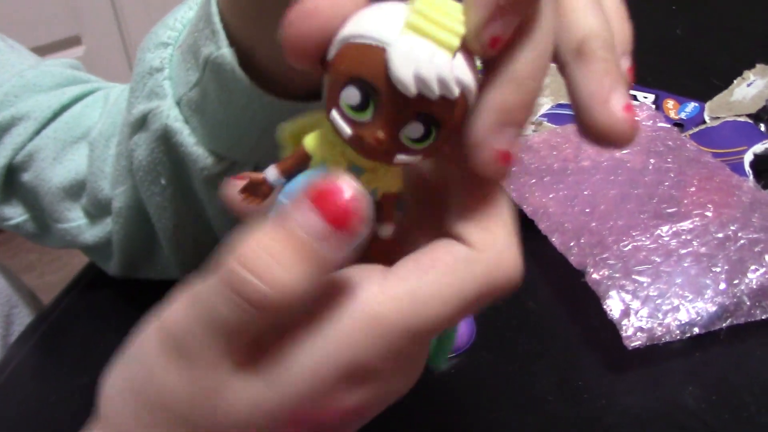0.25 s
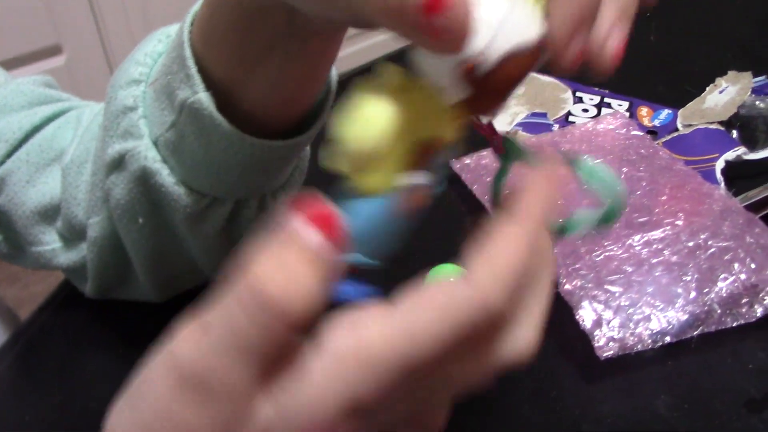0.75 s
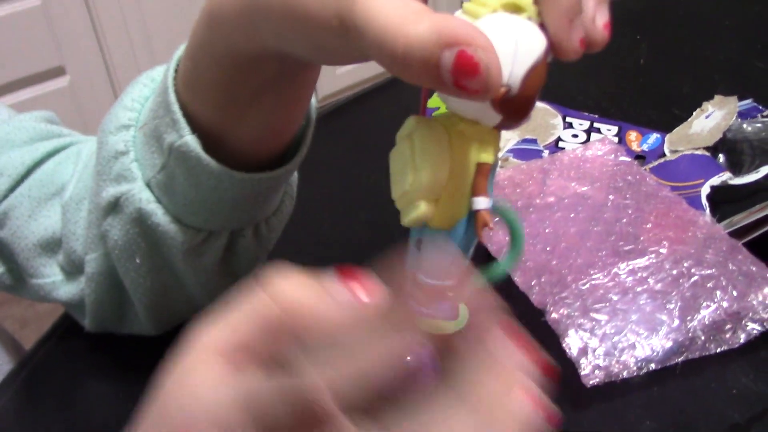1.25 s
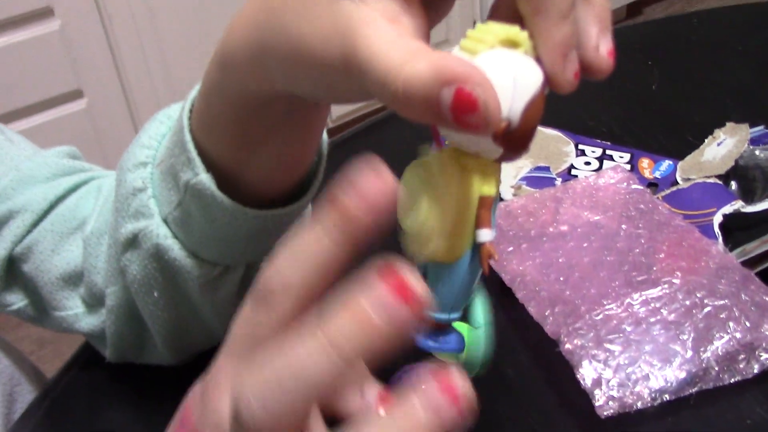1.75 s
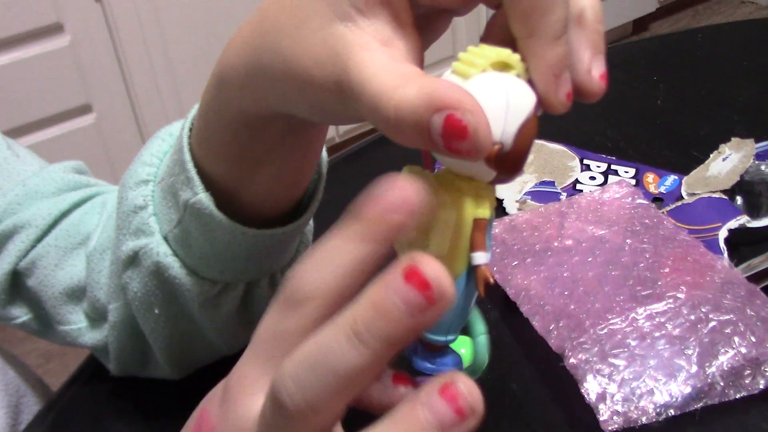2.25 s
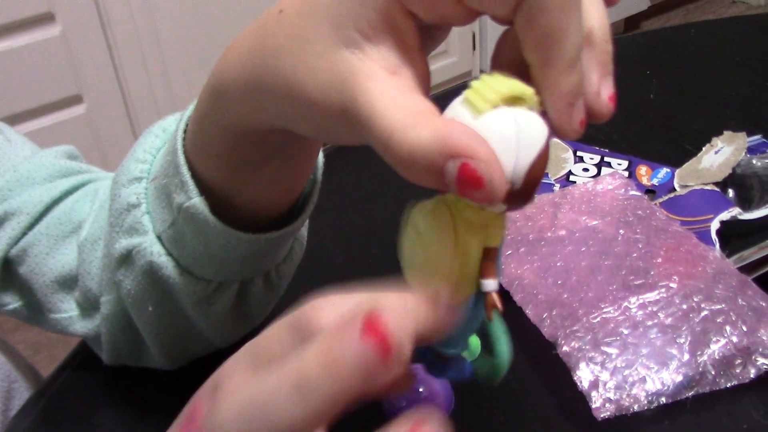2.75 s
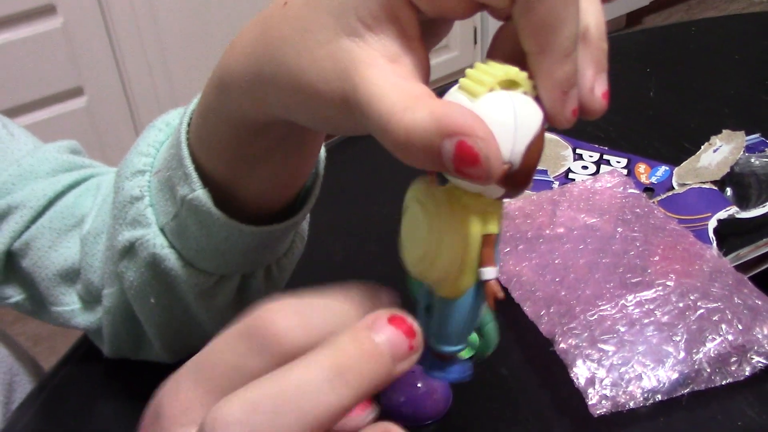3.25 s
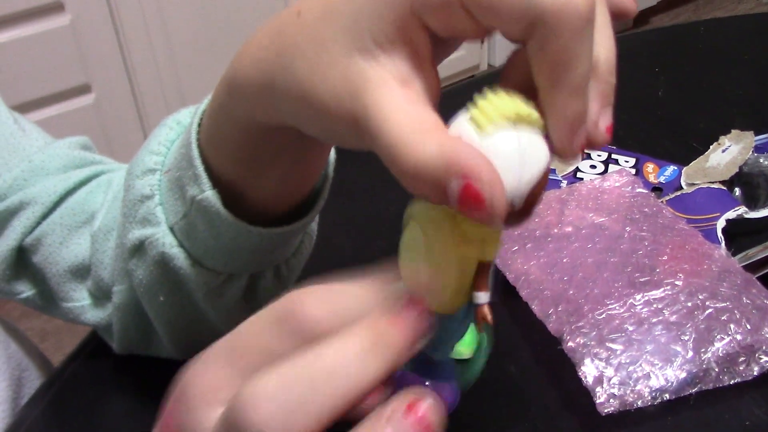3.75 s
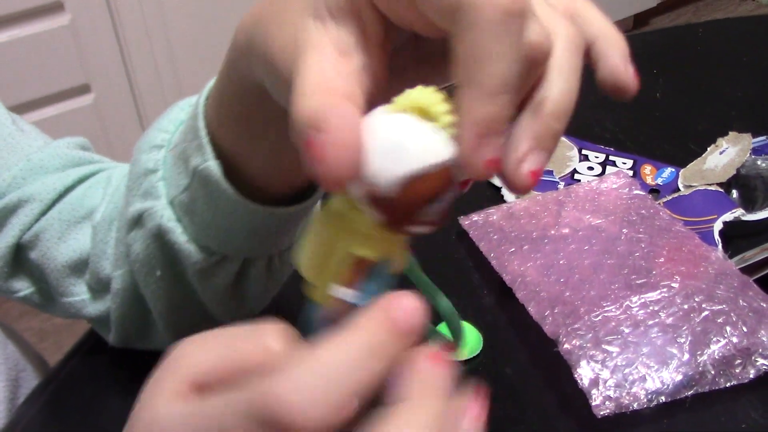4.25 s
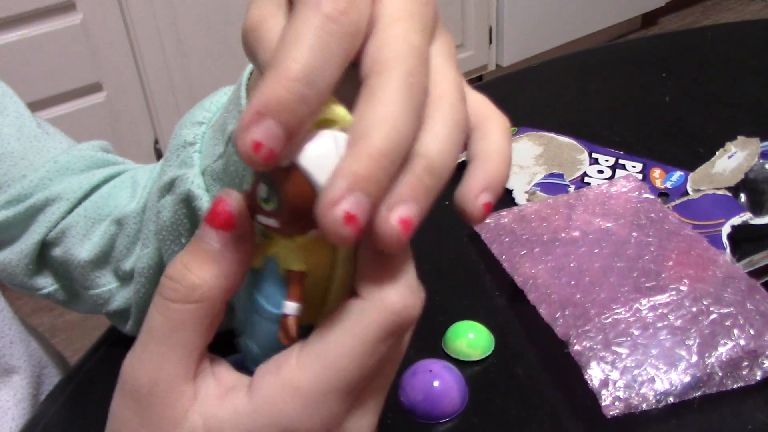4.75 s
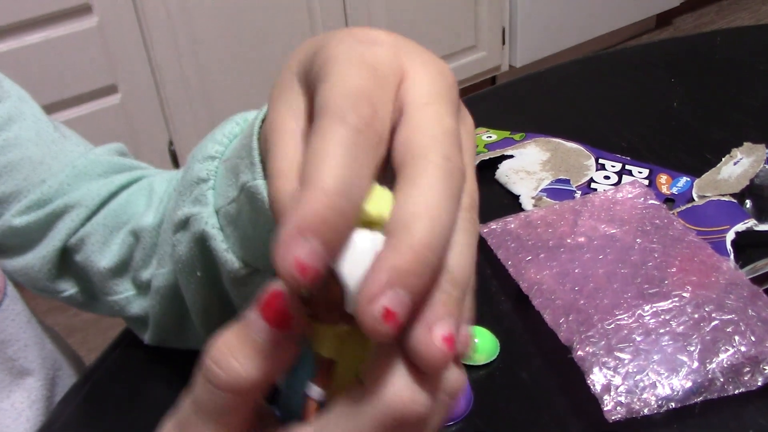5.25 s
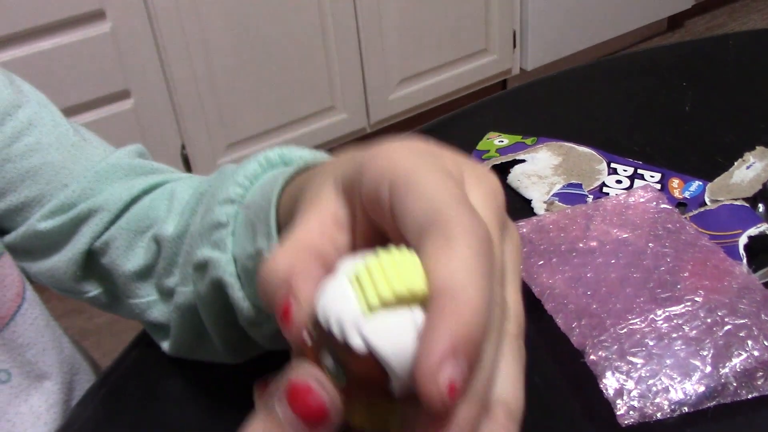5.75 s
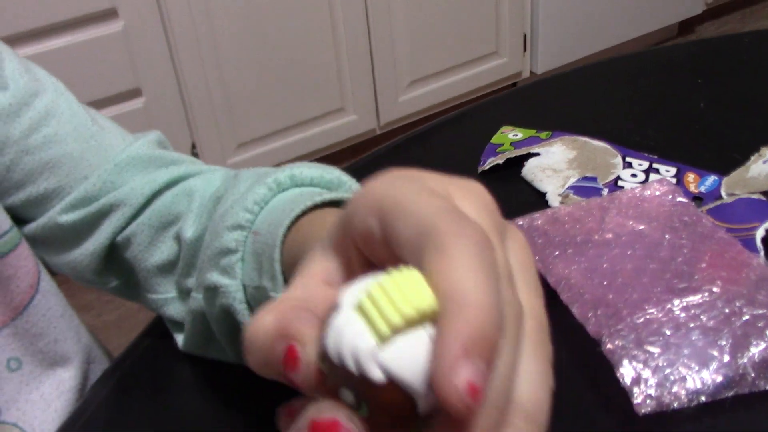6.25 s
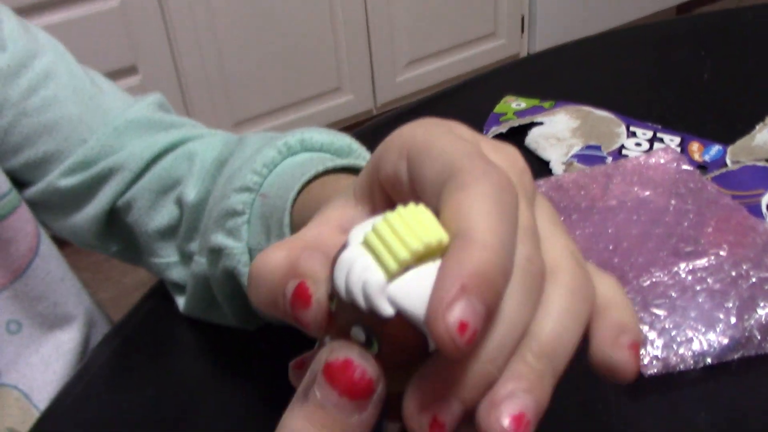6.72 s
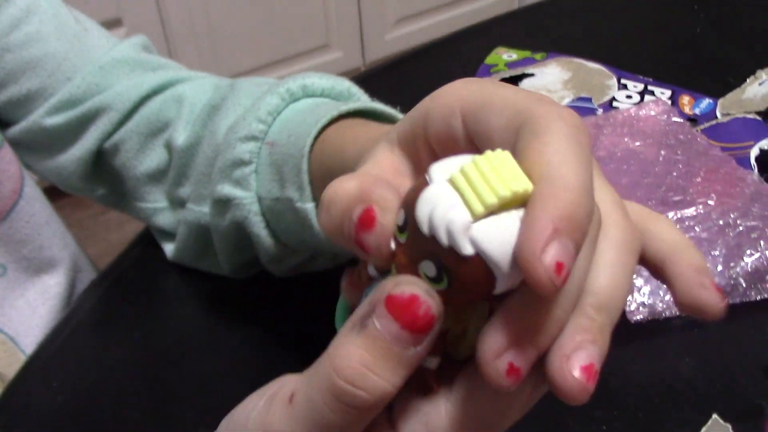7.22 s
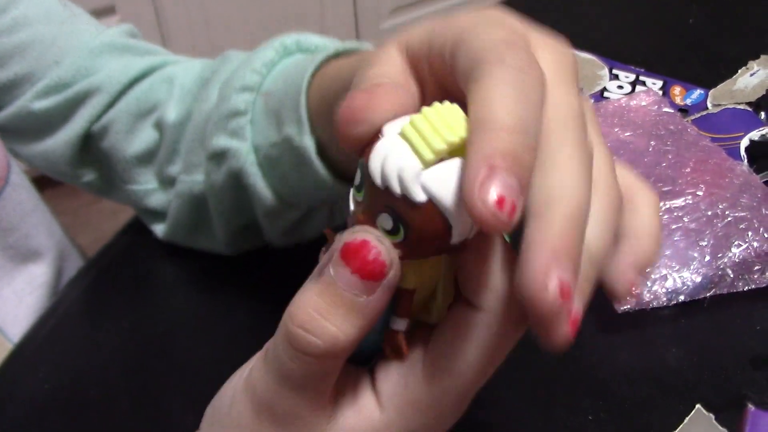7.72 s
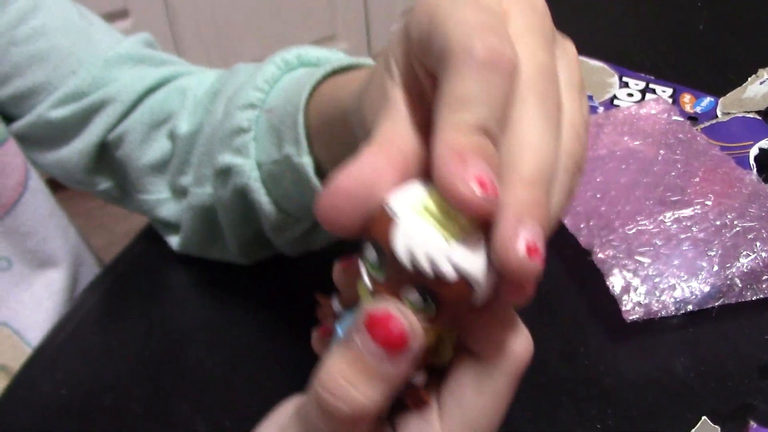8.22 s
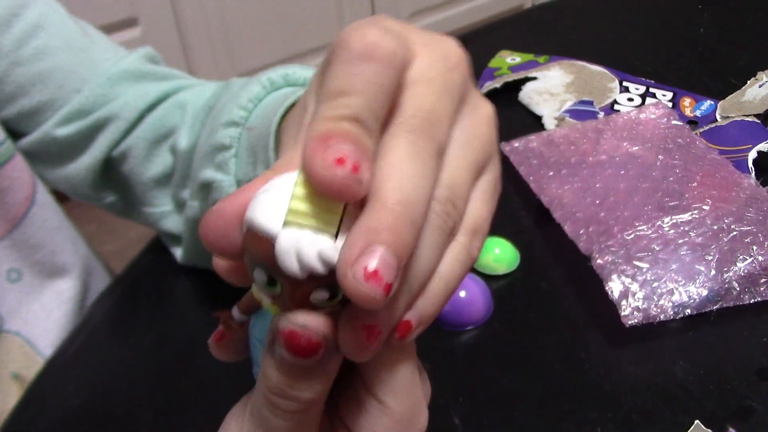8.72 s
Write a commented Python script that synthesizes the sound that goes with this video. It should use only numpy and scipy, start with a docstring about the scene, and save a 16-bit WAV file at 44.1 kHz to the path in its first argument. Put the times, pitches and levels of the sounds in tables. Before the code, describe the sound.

In a quiet kitchen, a low steady hum, soft hiss and a faint once-a-second clock tick run throughout. A small plastic toy is handled close to the microphone. From 0 to 1.3 s there are short scrapes and dry, muffled knocks, one stronger at 1.0. From 1.3 to 4 s the loose parts dangle and ring more freely: a dense rattling flurry at 1.3-1.6, scattered clacks and rubs, then strong knocks around 3.4 and 3.7. Soft wrist thuds touch the table near 1.1, 3.0 and 3.5. Handling thins out by 4.8. From 5.3 a stiff joint snaps sharply, irregularly until 7.5, with tiny pitched ticks between and clearer ones at 7.6-7.8. After a weak dull click at 8.0 and a faint rub, three much louder, brittle cracks hit at 8.6, 8.7 and 8.8, echoing briefly off the walls.

```python
"""Hands fiddle with a small plastic toy over a table in a quiet kitchen; drone, clock and room noise run throughout.
For some five seconds flicked parts knock and scrape (decaying modes, clumped impacts); wrists thud on the table.
Then a stiff joint snaps repeatedly (short shell modes plus noise), loudest at the end, amid small pitched ticks.
The room answers the toy with sparse decaying echoes; the air is shaped noise with narrow peaks."""
import sys
import numpy as np
from scipy import signal
from scipy.io import wavfile
from scipy.ndimage import uniform_filter1d

SR = 44100
rng = np.random.default_rng(int(sys.argv[2]) if len(sys.argv) > 2 else 0)


def transcribe(signal):
    """Save signal, clipped to [-1, 1], as a 16-bit WAV file at the path in sys.argv[1]."""
    frames = np.atleast_2d(signal).T
    limited = np.clip(frames, -1, 1)
    pcm = np.round(limited * 32767).astype(np.int16)
    wavfile.write(sys.argv[1], SR, pcm)


def invert_db(x):
    """Field ratio 10**(x/20) for x, a level in decibels (scalar or array-like)."""
    u = np.asarray(x, float) / 20
    return 10 ** u


N = 396018

# modes of the loose parts: f/Hz, level in its band/dB, t60/s
PARTS_MODES = [(1630, -11, .025), (2500, 1, .03), (2750, -4, .028), (4870, 0, .055), (5690, -4, .025),
               (6800, -1, .014), (7900, -6, .014), (8750, 0, .035), (9350, -3, .02), (11200, -9, .02)]
# borders of the low, middle and high bands of the parts: f/Hz
PARTS_EDGES_HZ = (1200, 3500, 6300, 11300)
# joint releases: t/s, upper-mode level/dB, favoured f/Hz, low and middle bands under that level/dB
SNAP_EVENTS = [(5.2748, -6, 7740, -35.5, -37), (5.3419, -5.5, 6620, -36, -30),
               (5.4468, -3.5, 7600, -33.5, -29.5), (5.4521, -12, 7950, -34, -17),
               (5.7844, -6.5, 7730, -32.5, -24.5), (5.9519, -9.5, 8140, -29.5, -21),
               (6.2087, -14.5, 9000, -25.5, -30), (6.2378, -7, 6800, -39.5, -28.5),
               (6.387, -7.5, 6970, -28, -24.5), (6.6002, -6.5, 8000, -39.5, -29.5),
               (6.6156, -14.5, 7340, -25.5, -31), (6.769, -20, 6860, -16.5, -17),
               (6.9275, -10.5, 10400, -41, -39), (7.003, -21, 7700, -20.5, -24),
               (7.1344, -18.5, 8350, -26, -24.5), (7.1535, -12.5, 8430, -27.5, -27.5),
               (7.3289, -9, 8100, -30.5, -32.5), (7.354, -14, 7480, -28.5, -26),
               (7.4662, -19, 6030, -26, -17), (7.4843, -11, 7300, -24.5, -26.5),
               (7.972, -31.5, 6000, -20.5, -14), (8.6142, 9.5, 9300, -22, -34.5),
               (8.7154, 9, 8400, -20.5, -33.5), (8.8222, 11, 8940, -23.5, -39.5)]
# while the toy hangs its parts ring freely: start t/s, end t/s
DANGLES_S = (1.3, 4.0)
GRIPPED_S = .015  # otherwise the hand chokes them within this time


def evened(x):
    """Scales to rms 1."""
    return x / np.sqrt(np.mean(x ** 2) + 1e-20)


def read(points, hz):
    """Reads a dB curve on a log-frequency axis."""
    f, value = np.transpose(points)
    return np.interp(np.log(hz + 1), np.log(f + 1), value)


def add(mix, start_s, sound):
    """Mixes a sound in at a time."""
    part = mix[round(start_s * SR):][:len(sound)]
    part += sound[:len(part)]


def rings(modes, edges_hz, spread_db, detune, crack_db, crack_s, held_s):
    """One blow, band by band: decaying modes plus a noise crack, choked to silence by held_s."""
    hz, db, t60 = np.transpose(modes)[..., None]
    t = np.arange(2048) / SR
    bands = len(edges_hz) - 1
    chance = rng.standard_normal((len(hz), 3))
    polarity_turns = .5 * (chance[:, 2:] > 0)
    turns = hz * (1 + detune * chance[:, :1]) * t + polarity_turns
    tones = invert_db(db + spread_db * chance[:, 1:2] - 60 * t / t60) * np.sin(2 * np.pi * turns)
    crack_level_db = crack_db + spread_db * rng.standard_normal() - 60 * t / crack_s
    crack = invert_db(crack_level_db) * rng.standard_normal((bands, len(t)))
    shape = np.minimum(t / 0.0001, 1) * np.clip(1 - t / held_s, 0, 1) ** 4.87
    group = np.searchsorted(edges_hz, hz[:, 0])
    out = []
    for k in range(bands):
        band = signal.butter(3, edges_hz[k:k + 2], "bandpass", fs=SR, output="sos")
        out.append(signal.sosfilt(band, shape * (tones[group == k + 1].sum(0) + crack[k])))
    return np.array(out)


def blows(events, crack_db, fall_db, dryness=0, **body):
    """Blows favour upper bands near their pitch, by fall_db/octave below and above; dryness: deep ones crack more."""
    out, edges = np.zeros(N), np.array(body["edges_hz"])
    centres = edges[1:-1] ** .7 * edges[2:] ** .3
    for s, peak_db, hz, *under_db in events:
        lower = len(under_db)
        dry_db = dryness * np.clip(under_db[0] + 10, -15, 5)
        parts = rings(crack_db=crack_db + dry_db, **body)
        parts /= np.sqrt((parts[:, :300] ** 2).mean(1, keepdims=True))  # by the rms of the first 300 samples
        below_db = fall_db[0] * np.maximum(np.log2(hz / centres), 0)
        above_db = fall_db[1] * np.maximum(np.log2(centres / hz), 0)
        upper = invert_db(below_db + above_db)[lower - 1:] @ parts[lower:]
        low = invert_db(np.array(under_db)) @ parts[:lower]
        add(out, s, invert_db(peak_db) * (upper / abs(upper).max() + low))
    return out


def taps():
    """Hard little parts knock the hollow body; finger blows and the grip choke the ring."""
    # knocks: t/s, upper-mode level/dB, favoured f/Hz, low band under that level/dB
    knocks = [(0.142, -29, 4420, -14), (0.279, -45, 3500, 4.5), (0.342, -41, 4970, -19),
              (0.4768, -33.5, 4470, -23), (0.757, -41.5, 7500, -15), (0.985, -30, 3960, -12),
              (1.0093, -13, 3950, -24.5), (1.103, -32.5, 4500, -14), (1.1247, -26, 5150, -26),
              (1.3305, -24.5, 4870, -13.5), (1.3572, -32.5, 3800, -2.5), (1.3628, -22, 8720, -21),
              (1.383, -21, 9260, -21.5), (1.3888, -27, 4890, -11), (1.408, -40, 7500, -24),
              (1.428, -37, 4870, -30), (1.4627, -27, 4860, -22), (1.4774, -42, 8700, -29),
              (1.4945, -25.5, 4340, -21), (1.501, -40, 7500, -32), (1.5383, -25, 4630, -35.5),
              (1.546, -28, 4900, -41.5), (1.5662, -33, 4830, -37), (1.582, -31, 4750, -35),
              (1.59, -31, 4500, -36), (1.718, -30, 4140, -12), (1.7446, -34, 4450, -30),
              (1.812, -25.5, 8560, -10.5), (1.8569, -30.5, 6700, -13), (1.901, -30, 4630, -20),
              (2.223, -25, 5300, -21.5), (2.2772, -21, 4790, -20.5), (2.317, -30.5, 5070, -18),
              (2.379, -30, 9190, -38), (2.4695, -36, 4330, -27.5), (2.6518, -25.5, 9110, -12.5),
              (2.701, -30, 4740, -21), (2.727, -34.5, 3880, -20.5), (2.797, -35.5, 4830, -18),
              (2.942, -43.5, 4730, -23), (3.0025, -34.5, 6050, -11), (3.0747, -29.5, 4870, -26),
              (3.0865, -26.5, 5230, -33), (3.1176, -26.5, 4700, -29), (3.131, -29, 4570, -23),
              (3.2565, -49, 6500, -20), (3.2803, -37, 4600, -32.5), (3.299, -40, 4900, -24.5),
              (3.3449, -34.5, 6930, -8.5), (3.37, -31, 7310, -19.5), (3.38, -19.5, 4200, -15.5),
              (3.4014, -34, 8600, -25), (3.4193, -28.5, 4870, -33), (3.425, -29, 4870, -30),
              (3.452, -36, 8790, -24), (3.4626, -37, 4700, -24.5), (3.472, -39, 4800, -31),
              (3.679, -14.5, 6560, -19), (3.691, -25, 6800, -18), (3.7061, -19.5, 5170, -21),
              (3.735, -30, 5600, -31), (3.775, -33, 4870, -28.5), (3.8285, -37, 3880, -21),
              (4.075, -44, 3650, -3), (4.1649, -25, 4970, -14), (4.4172, -30.5, 4630, -12.5),
              (4.4603, -40.5, 7100, -2), (4.523, -33.5, 8700, -21.5), (4.552, -43.5, 4100, -4.5),
              (4.773, -43.5, 4320, -5.5)]
    deep_db = -20.5  # stronger low modes: a finger blow
    free = [row for row in knocks if DANGLES_S[0] < row[0] < DANGLES_S[1] and row[3] < deep_db]
    held = [row for row in knocks if row not in free]
    body = dict(fall_db=(-12, -11), spread_db=5, dryness=.7, crack_s=.014,
                modes=PARTS_MODES, edges_hz=PARTS_EDGES_HZ)
    ringing = blows(free, detune=.008, crack_db=11, held_s=.04, **body)
    return ringing + blows(held, detune=.08, crack_db=17, held_s=GRIPPED_S, **body)


def snaps():
    """The joint releases at once and the gripped shell dies within a few milliseconds."""
    # shell modes: f/Hz, level in its band/dB
    shell = [(500, -5), (1520, 0), (2690, 13), (3130, 0), (3850, -7), (4550, -6), (5870, 11), (6550, 18),
             (7200, 11), (8850, 1), (9700, -3), (12100, -9)]
    # borders of the four shell bands: f/Hz
    shell_edges_hz = (280, 3400, 5500, 7500, 14000)
    modes = [(hz, db, .016) for hz, db in shell]  # t60 16 ms
    crack_db = np.array([[-15], [-1], [8], [-3]])  # per band
    return blows(SNAP_EVENTS, crack_db, fall_db=(-17, -9), modes=modes, edges_hz=shell_edges_hz,
                 spread_db=2, detune=.004, crack_s=0.024, held_s=0.0094)


def slips(per_s, spread_db, detune, crack_db, middle_db, held_s):
    """Random small impacts of ten kinds, each in clumps, excite the modes of the parts: body and treble."""
    body, treble = np.zeros((2, N))
    for kind in range(10):
        hits = invert_db(4.5 * np.minimum(rng.exponential(1, N), 3)) * (rng.random(N) < per_s / 10 / SR)
        clumps_db = 3.5 * np.interp(np.arange(N), np.arange(0, N, 700), rng.standard_normal(N // 700 + 1))
        hits *= invert_db(clumps_db)
        low, middle, high = rings(PARTS_MODES, PARTS_EDGES_HZ, spread_db, detune, crack_db, .014, held_s)
        body += signal.oaconvolve(hits, low + invert_db(middle_db) * middle)[:N]
        treble += signal.oaconvolve(hits, high)[:N]
    return evened(body), evened(treble)


def scrapes():
    """Firm finger strokes rub densely and roughly; the rattle after them lets the parts tick and ring."""
    # strokes: centre t/s, half length/s, body level/dB, treble level/dB, rattle length/s
    strokes = [(0.053, 0.019, -40, -49.5, 0.039), (0.287, 0.004, -44, -75, 0.11),
               (0.596, 0.029, -41, -48, 0.055), (1.023, 0.027, -48.5, -59, 0.044),
               (1.357, 0.019, -39.5, -48, 0.52), (1.866, 0.0053, -30, -47, 0.072),
               (2.269, 0.012, -43, -37.5, 0.28), (2.704, 0.0084, -43, -52, 0.19),
               (3.054, 0.019, -49, -67, 0.95), (3.368, 0.0076, -32.5, -36.5, 0.14),
               (3.706, 0.018, -44, -65, 0.12), (4.458, 0.012, -50.5, -51, 0.026),
               (4.794, 0.058, -60, -64.5, .02), (8.331, 0.06, -60.5, -65.5, 0.018)]
    start_db, most_db = -3.5, -47.5  # rattle start re the stroke's body; its highest level
    treble_db, fade_db = -13.5, -15  # rattle treble re its body; change over its length
    t = np.arange(N) / SR
    power = np.zeros((2, N))  # body, treble
    for s, half, body_db, stroke_treble_db, length in strokes:
        stroke = invert_db(np.array([[body_db], [stroke_treble_db]])) ** 2
        power += stroke * np.exp(-((t - s) / half) ** 2)
        done = (t - s) / length
        rattle = invert_db(min(body_db + start_db, most_db) + fade_db * np.clip(done, 0, 1))
        rattle *= (done > 0) * np.clip((1 - done) * length / 0.026, 0, 1)  # last 26 ms fade out
        power += (invert_db(np.array([[0], [treble_db]])) * rattle) ** 2
    firm = power[0] / (power[0] + invert_db(-47.5) ** 2)
    rub = slips(per_s=1200, spread_db=6, detune=.03, crack_db=1, middle_db=2, held_s=.03)
    loose = slips(per_s=320, spread_db=9, detune=.025, crack_db=4, middle_db=-5, held_s=.04)
    gripped = slips(per_s=350, spread_db=8, detune=.08, crack_db=6, middle_db=0, held_s=GRIPPED_S)
    ticking = np.where((t > DANGLES_S[0]) & (t < DANGLES_S[1]), loose, gripped)
    return (np.sqrt(power * firm) * rub + np.sqrt(power * (1 - firm)) * ticking).sum(0)


def ticks():
    """Small pitched ticks as the grip shifts: two decaying modes with a broad click at the start."""
    # ticks: t/s, level/dB, f/Hz
    tick_rows = [(5.488, -38, 3220), (5.577, -41.5, 3760), (5.61, -38, 2780), (5.715, -37, 2630),
                 (5.923, -45.5, 7360), (5.993, -37, 2840), (7.537, -30.5, 6630), (7.546, -29.5, 3870),
                 (7.633, -21, 3560), (7.765, -40.5, 7500), (7.799, -23.5, 3700), (8.521, -40.5, 2800),
                 (8.553, -33.5, 8000)]
    cycles_t60, pair_ratio = 24, 1.13  # decay in cycles of the lower mode; second mode over first
    click_db, click_t60_s = -3.5, 0.0061
    out, t = np.zeros(N), np.arange(1500) / SR
    for s, level_db, hz in tick_rows:
        noise = uniform_filter1d(rng.standard_normal(len(t)), size=4)
        click = invert_db(click_db - 60 * t / click_t60_s) * noise
        pair = np.sin(2 * np.pi * hz * np.outer([1, pair_ratio], t)).mean(0)
        ring = invert_db(-60 * t * hz / cycles_t60) * pair
        add(out, s, invert_db(level_db) * np.minimum(t / 0.000087, 1) * (ring + click))
    return out


def cracks():
    """The bare, broad crack of each snap, thrown sideways to the walls: a band-passed impulse."""
    out = np.zeros(N)
    for s, peak_db, *_ in SNAP_EVENTS:
        add(out, s, invert_db(peak_db + 9.5) * np.ones(1))
    return signal.sosfilt(signal.butter(2, (3800, 12500), "bandpass", fs=SR, output="sos"), out)


def room(x):
    """Walls answer after a short gap: sparse echoes of random sign, each band dying at its own speed."""
    # reverberation: f/Hz, t60/s, relative level/dB
    decay = [(494, 0.29, 6.5), (4500, 0.19, -0.5), (9000, 0.23, -8), (13130, 0.13, -13.5)]
    # nearest cupboard, dull: t/s, level/dB
    cupboard = [(0.0158, -17)]
    room_db, side_db = -16, -15.5  # side is low: the two capsules sit close together
    length = SR // 2
    echoes = np.zeros((2, length))
    at = np.arange(100, length - 20, 20) + rng.integers(0, 20, (2, (length - 101) // 20))
    np.put_along_axis(echoes, at, rng.choice([-1., 1.], at.shape), 1)
    echoes *= np.clip((np.arange(length) / SR / .009) ** 2, 0, 1)  # reflections build up over 9 ms
    hz, t, z = signal.stft(echoes, SR, nperseg=128)
    f, t60, colour_db = np.transpose(decay)
    field_db = np.interp(hz, f, colour_db)[:, None] - 60 * t / np.interp(hz, f, t60)[:, None]
    middle, side = signal.istft(z * invert_db(field_db), SR, nperseg=128)[1]
    gain = invert_db(room_db) / np.linalg.norm(middle)
    middle, side = gain * middle, gain * invert_db(side_db) * side
    for s, db in cupboard:
        add(middle, s, invert_db(db) * signal.firwin(15, 5000, fs=SR))
    return signal.fftconvolve(x[None], np.array([middle + side, middle - side]), axes=1)[:, :N]


def bumps():
    """Wrists on the table top: soft low thuds, decaying sines that fall in pitch."""
    # thuds: t/s, level/dB
    thuds = [(1.06, -48), (2.96, -46), (3.462, -37)]
    out, t = np.zeros(N), np.arange(6000) / SR
    thud = invert_db(-60 * t / 0.11) * np.sin(2 * np.pi * (110 - 300 * t) * t) * np.minimum(t / 0.006, 1)
    for s, level_db in thuds:
        add(out, s, invert_db(level_db) * thud)
    return out


def clock():
    """Once a second the distant clock case swells and fades at its resonance, some ticks barely heard."""
    # successive ticks: level/dB
    tick_db = [-47, -50, -41, -54, -47, -48, -54, -54, -57]
    first_s, case_hz = .305, 785  # middle of the first tick
    out, t = np.zeros(N), np.arange(-2000, 2000) / SR
    tick = np.exp(-abs(t) / 0.014) * np.sin(2 * np.pi * case_hz * t)
    for k, db in enumerate(tick_db):
        add(out, first_s + k + t[0], invert_db(db) * tick)
    return out


def air():
    """Room noise and microphone hiss as shaped noise, the appliance drone as narrow peaks in its spectrum."""
    # noise spectrum: f/Hz, relative density/dB
    noise_curve = [(25, -42), (87, -19), (190, 2.5), (230, -1), (584, -13.5), (902, -15), (2000, -24),
                   (9330, -37.5), (15200, -49.5), (16500, -55)]
    # drone resonances: f/Hz, width/Hz, rms level/dB
    drone = [(174, 29, -58), (201.26, 3.6, -50), (245.6, 16, -58), (349.2, 8.2, -62.5), (403.8, 6, -61),
             (579.5, 13, -62.5), (811, 16, -70), (1035, 15, -69.5)]
    # stereo width: f/Hz, side re middle/dB; the left channel carries slightly more middle
    width_curve = [(60, 0), (150, -34), (450, -16), (2400, -10.5), (15000, -12.5)]
    noise_rms_db = -49.5
    frames, hz = N // 1024 + 6, np.fft.rfftfreq(4096, 1 / SR)
    power = invert_db(read(noise_curve, hz)) ** 2
    power *= invert_db(noise_rms_db) ** 2 / power.sum()
    for f, width, db in drone:
        bell = 1 / (1 + (2 * (hz - f) / width) ** 2) ** 2
        power = power + invert_db(db) ** 2 * bell / bell.sum()
    a, b, c, d = rng.standard_normal((frames, len(hz), 4)).T
    middle = a + 1j * b
    side = (c + 1j * d) * invert_db(read(width_curve, hz))[:, None]
    z = np.array([1.04 * middle + side, middle - side]) * np.sqrt(power)[:, None]
    noise = signal.istft(z, nperseg=4096, noverlap=3072)[1][:, :N]
    return np.sqrt(power.sum()) * evened(noise)


def scene():
    """Toy near the centre, its room answer, table, clock and air."""
    handling = taps() + scrapes() + ticks()
    joint = snaps()
    toy = handling + joint
    all_round = handling + invert_db(-7) * joint + cracks()  # the walls hear a broader sound
    side = invert_db(-24.5) * np.roll(toy, 9)  # a nearby surface reaches the capsules unevenly
    near = np.array([toy + side, toy - side])
    clock_pan = invert_db(np.array([[1.5], [-1.5]]))
    return near + room(all_round) + bumps() + clock() * clock_pan + air()


def roll_off(x):
    """The treble ends steeply here."""
    return signal.sosfilt(signal.butter(12, 16790, fs=SR, output="sos"), x)


def record(dry):
    """Peaks clip at 0.85 of full scale, then a steep low-pass limits the band."""
    clipped = np.clip(dry, -.85, .85)
    limited = signal.sosfilt(signal.butter(16, 16700, fs=SR, output="sos"), clipped)
    return roll_off(limited)


dry = scene()
out = record(dry)
transcribe(out)
```